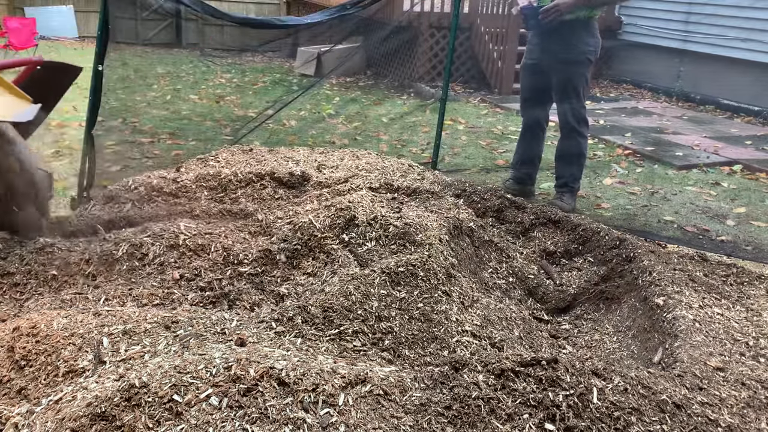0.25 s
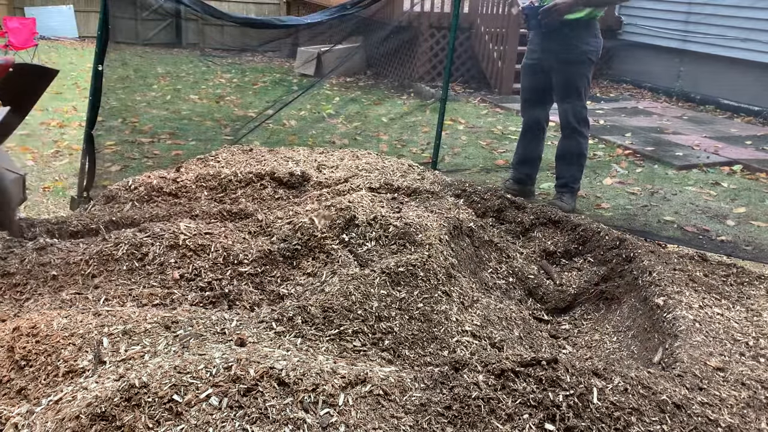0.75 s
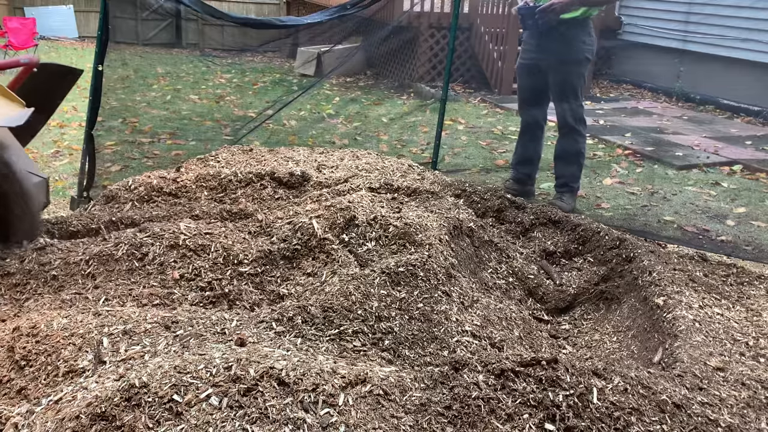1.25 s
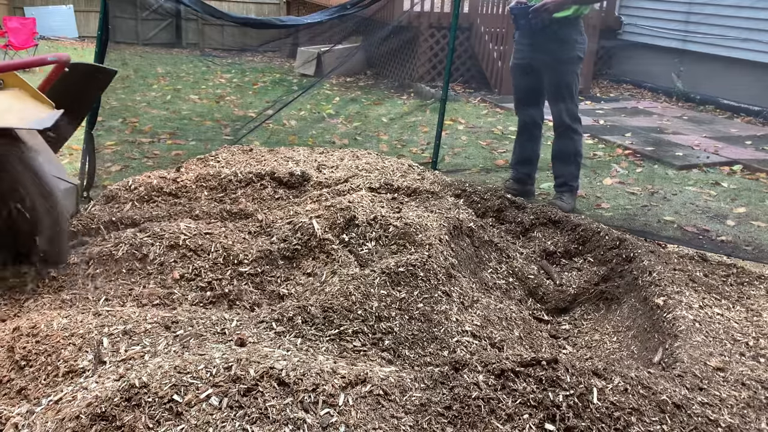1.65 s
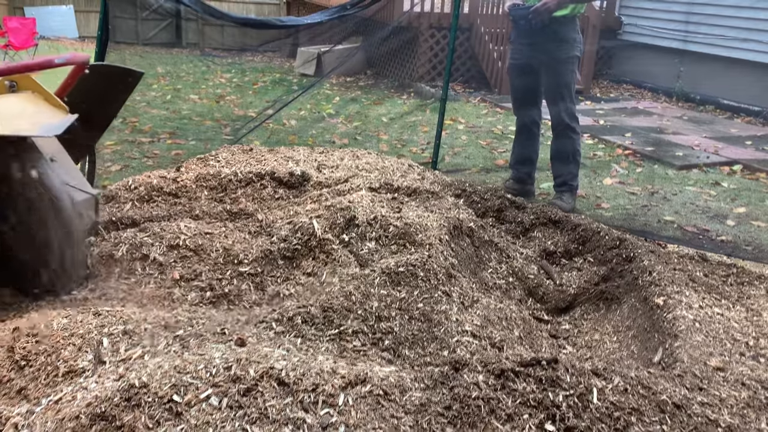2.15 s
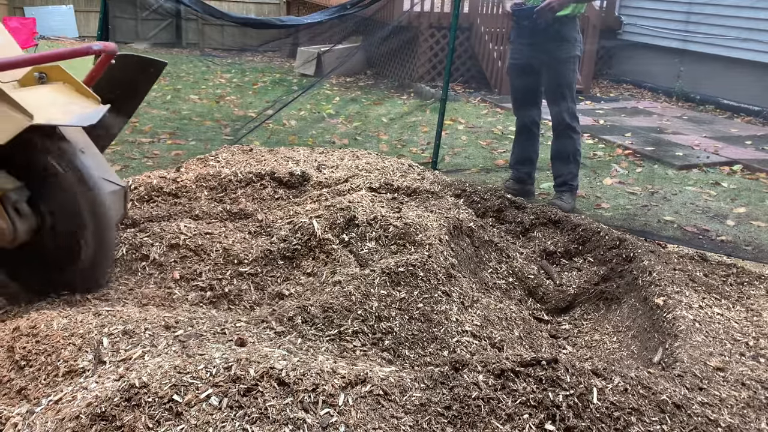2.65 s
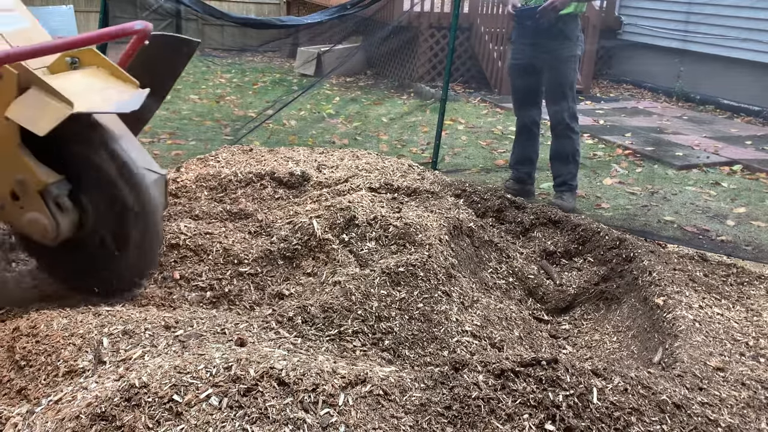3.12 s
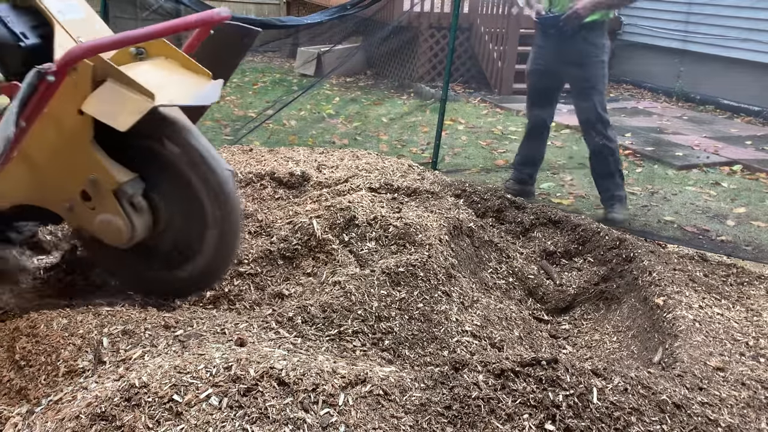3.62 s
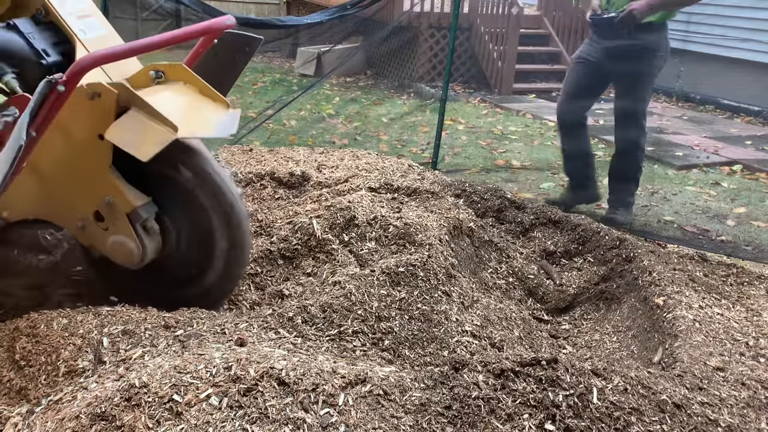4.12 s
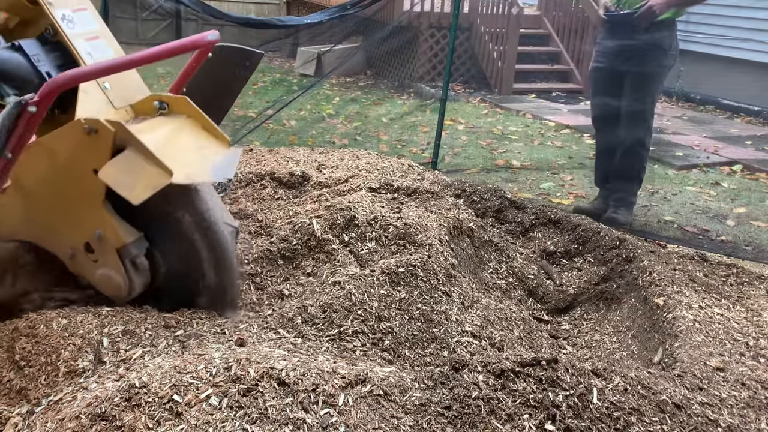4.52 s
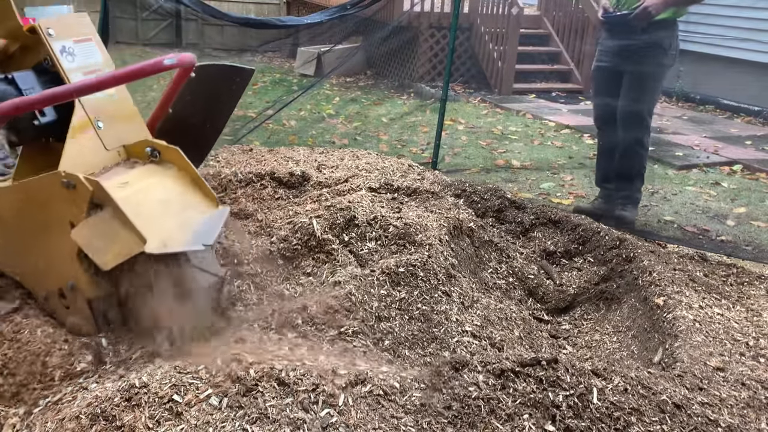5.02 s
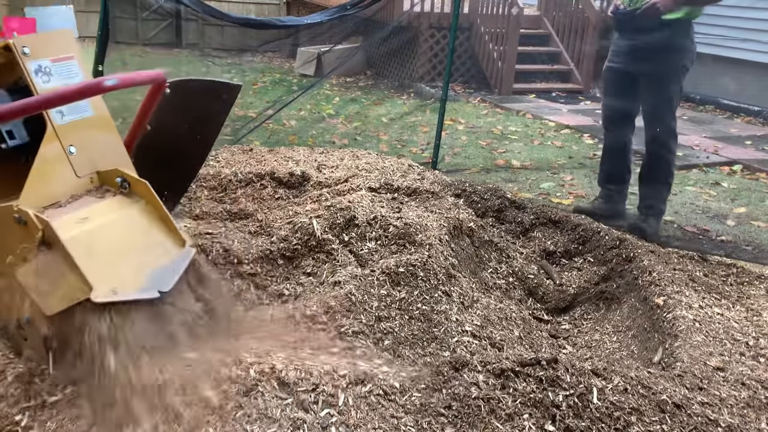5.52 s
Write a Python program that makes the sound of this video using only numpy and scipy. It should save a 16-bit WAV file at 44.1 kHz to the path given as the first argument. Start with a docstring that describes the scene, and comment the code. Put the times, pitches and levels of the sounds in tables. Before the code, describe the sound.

Outdoors in a yard, a petrol stump grinder runs without pause, a low engine drone near 107 hertz under a hydraulic whine. Wheel roar and metal rattle swell as it creeps closer. Scattered bright chips tick on the steel guard, then near five seconds chips hit densely, teeth thud in wood and lumps clank. Close stereo microphones.

```python
"""Stump grinder creeping closer

A petrol stump grinder comes closer from the left across wood chips in a yard, heard by a microphone pair.
Sines locked to the crank make the two-cylinder engine's drone and the whine of hydraulic pump and gears.
Shaped noise makes rumble, wheel roar, casing rattle and the hiss of chips and dust; jolts ring the panels.
Short bursts and struck modes place the chips on the guard, the lumps on steel and the teeth in the wood."""
import sys
import numpy as np
from scipy import signal
from scipy.fft import rfft, irfft, next_fast_len
from scipy.io import wavfile
from scipy.ndimage import uniform_filter1d

SR = 44100
rng = np.random.default_rng(int(sys.argv[2]) if len(sys.argv) > 2 else 0)


def store_wav(level_fs):
    """Save 16-bit WAV to argv[1]."""
    pcm = np.round(np.clip(np.atleast_2d(level_fs), -1, 1) * 32767)
    wavfile.write(sys.argv[1], SR, pcm.T.astype(np.int16))


N = 254456


def gain_of(db):
    """Decibels to gain."""
    return 10 ** (np.asarray(db) / 20)


def evened(x):
    """Scales to rms 1."""
    return x / np.sqrt(np.mean(x ** 2) + 1e-20)


def curves(rows):
    """The columns of a timed table after its first, one value a sample."""
    s, *columns = np.transpose(rows)
    return [np.interp(np.arange(N) / SR, s, column) for column in columns]


def drift(top_hz):
    """Slow random wandering of about rms 1, low-passed at top_hz."""
    steps = rng.standard_normal(N // 64 + 2)  # one step every 64 samples
    smooth = signal.lfilter(*signal.butter(2, top_hz, fs=SR / 64), steps)
    return np.interp(np.arange(N) / 64, np.arange(len(steps)), evened(smooth))


def noise(spectrum, patchy_db, flicker_db, size):
    """Two unrelated noises of one colour that share drifting patches and wide-band flicker."""
    frames = 4 * N // size + 5
    hz = np.fft.rfftfreq(size, 1 / SR)
    a, b, c, d, patches = rng.standard_normal((frames, len(hz), 5)).T
    patches = uniform_filter1d(patches, size=8, axis=0)
    patches = evened(uniform_filter1d(patches, size=8, axis=1))
    table_hz, table_db = np.transpose(spectrum)
    shape_db = np.interp(np.log(hz + 1), np.log(table_hz), table_db, right=-90)[:, None]
    flicker = flicker_db * rng.standard_normal(frames)
    bins = np.array([a + 1j * b, c + 1j * d]) * gain_of(shape_db + patchy_db * patches + flicker)
    return evened(signal.istft(bins, nperseg=size, noverlap=3 * size // 4)[1][:, :N])


def tone(turns, multiple, db, waver_db, wobble, lag=0):
    """A sine locked to the crank, wavering in level and phase; db is rms, wobble and lag in radians."""
    phase = 2 * np.pi * (multiple * turns + rng.random()) + wobble * drift(10.2)
    return np.sqrt(2) * gain_of(db + waver_db * drift(15.4)) * np.sin(phase - lag)


def knocks(rows, decay, rise_s, tick_db, dull, ring):
    """A wide tick together with noise and a sine at a centre pitch for each blow; narrow ones ring longer."""
    out = np.zeros((2, N + 2048))
    t = np.arange(2048) / SR
    hz = np.fft.rfftfreq(2048, 1 / SR) + 1
    draws = rng.standard_normal((len(rows), 2, 2, 2048))
    for (start_s, level_db, centre_hz, octaves), (white, grit) in zip(rows, draws):
        band = 1 / (1 + (2 * np.log2(hz / centre_hz) / octaves) ** 4)
        t60 = decay[0] + decay[1] / octaves  # dull part s, ringing part s octaves
        crunch = evened(irfft(rfft(white) * band * (centre_hz / hz) ** dull))
        struck = crunch + ring * np.sin(2 * np.pi * centre_hz * t)
        burst = struck * (1 - np.exp(-t / rise_s)) * gain_of(-60 * t / t60)
        bright = evened(np.diff(grit, prepend=0))  # differenced noise is bright
        tick = bright * gain_of(tick_db - 60 * t / 0.0095)
        out[:, round(start_s * SR):][:, :2048] += gain_of(level_db) * (burst + tick)
    return out[:, :N]


def nearing(start_db, share):
    """Level of a layer that follows a share of the approach, in dB."""
    # the machine creeps closer: start_s, rise_db (added in full at share 1)
    approach = [(0, 1), (.6, 1.5), (1.05, 3), (1.5, 2), (1.9, 3.5), (2.15, 4), (2.45, 4), (2.7, 5.5),
                (3.3, 7.5), (3.9, 9), (4.4, 9), (4.9, 9.5), (5.2, 12), (5.55, 10.5), (5.77, 12.5)]
    return start_db + share * curves(approach)[0]


def crank_turns():
    """Crank turns so far; the engine sags under load and the governor hunts."""
    # crank speed: start_s, turns_per_s
    crank_speed = [(0, 52.6), (.3, 53.3), (.45, 53.6), (.56, 54.35), (.72, 54.7), (.83, 54.65), (.93, 53.6),
                   (1.11, 54.0), (1.28, 52.65), (1.68, 51.95), (2.0, 53.35), (2.12, 54.15), (2.31, 54.3),
                   (2.45, 54.0), (2.58, 54.1), (2.76, 53.7), (2.87, 53.9), (3.02, 53.55), (3.17, 53.9),
                   (3.32, 53.7), (3.45, 53.95), (3.57, 53.9), (3.7, 54.45), (4.05, 54.2), (4.5, 53.3),
                   (4.72, 52.1), (5.0, 52.08), (5.19, 51.6), (5.48, 51.95), (5.63, 52.4), (5.77, 52.3)]
    return np.cumsum(curves(crank_speed)[0]) / SR


def engine_rumble():
    """Low noise of the engine, swelling as the machine comes closer."""
    # colour of the rumble: pitch_hz, relative_density_db
    rumble_colour = [(16, -62), (30, -62), (44, -46), (57, -1.5), (85, -2.5), (140, 2), (190, 3),
                     (225, -16), (260, -28), (400, -44)]
    level_db = nearing(start_db=-30.5, share=0.27) + 0.41 * drift(3.0)
    return gain_of(level_db) * noise(rumble_colour, patchy_db=0.0, flicker_db=1.0, size=4096)


def spray_and_dust():
    """Chips and dust hiss in gusts, grained by dense random ticks of uneven size."""
    # levels before the gusts and ticks: start_s, chip_spray_db, finest_dust_db
    spraying = [(0, -45.5, -49), (.45, -49.5, -50), (1.0, -44.5, -46), (1.45, -43.5, -48),
                (1.7, -39, -41.5), (2.05, -39.5, -34.5), (2.35, -41.5, -44), (2.6, -41, -39.5),
                (3.15, -40, -42), (3.4, -45.5, -49), (3.7, -46, -47.5), (3.95, -40.5, -42),
                (4.1, -38, -39.5), (4.5, -38, -37.5), (5.0, -36.5, -37.5), (5.3, -33, -40),
                (5.55, -34.5, -39), (5.77, -34, -36)]
    # colour of the chip spray: pitch_hz, relative_density_db
    spray_colour = [(2000, -25), (4000, -8), (5500, -5), (6600, 0), (7600, -3), (8400, -1), (9600, -2),
                    (10800, -5), (12500, -12), (16000, -22)]
    # colour of the finest dust: pitch_hz, relative_density_db
    dust_colour = [(7000, -25), (10500, -7), (12500, -4), (15000, 0), (18000, 0)]
    ticks_per_s, tick_t60_s = 260, 0.0015
    spray_db, dust_db = np.array(curves(spraying)) + 1.8 * drift(11.0)
    sizes = gain_of(1.9 * np.minimum(rng.exponential(1, N), 3.5))
    ticks = sizes * (rng.random(N) < ticks_per_s / SR)
    grain = signal.oaconvolve(ticks, gain_of(-60 * np.arange(1000) / SR / tick_t60_s))[:N]
    chips = gain_of(spray_db) * noise(spray_colour, patchy_db=2.0, flicker_db=1.5, size=256)
    dust = gain_of(dust_db) * noise(dust_colour, patchy_db=1.0, flicker_db=1.2, size=256)
    return (1 + 0.3 * grain) * (chips + dust)


def guard_chips():
    """Chips strike the steel guard: bright, mostly noisy bursts that die in milliseconds."""
    # chips that hit the guard: start_s, level_db (before rise and decay), centre_hz, width_octaves
    chip_hits = [(0.137, -24.5, 8900, 1.3), (0.1961, -19, 7960, 1.3), (0.2005, -27, 6540, 0.36),
                 (0.28, -26, 9000, 1.5), (0.2905, -27.5, 6900, 0.21), (0.294, -25, 3960, 0.73),
                 (0.6928, -22, 6370, 2.5), (0.73, -22.5, 6700, 0.27), (0.8181, -25, 9400, 0.86),
                 (1.0064, -32, 7100, 0.23), (1.4561, -25, 9500, 0.97), (1.4793, -25.5, 6870, 0.19),
                 (1.487, -19, 4400, 1), (1.5144, -21, 7800, 1.2), (1.5255, -23, 6470, 1.3),
                 (1.5332, -23, 9500, 1.2), (1.553, -26, 10000, 1), (1.5728, -14, 9000, 2.3),
                 (1.592, -20, 7345, 1.5), (1.612, -27, 10000, .6), (1.6339, -27, 7200, 0.62),
                 (1.7469, -23, 6410, 1.1), (1.8883, -18.5, 6948, 1.2), (1.9849, -26, 10900, 1),
                 (2.0607, -25, 6750, .6), (2.1617, -20, 8450, 0.87), (2.2378, -25, 8400, 0.7),
                 (2.2679, -17, 8100, 1), (2.5161, -20, 10000, 1.6), (2.543, -26.5, 5600, 0.41),
                 (2.8303, -22, 9160, 1.1), (2.9313, -30, 7600, 1.5), (2.9509, -20, 9800, 0.65),
                 (3.0614, -25, 6280, 1), (3.0809, -11, 9200, 2.3), (3.0885, -17, 10300, 1.3),
                 (3.1373, -23, 10800, 1), (3.174, -22, 10800, .9), (3.269, -21, 9000, 2),
                 (3.3056, -17.5, 8000, 2.2), (3.308, -29, 5670, 0.42), (3.4287, -21, 8800, 1.2),
                 (3.9661, -18, 5770, 1.6), (4.0018, -27, 6700, 0.27), (4.088, -22, 6430, 0.45),
                 (4.1187, -20, 6760, 0.27), (4.4004, -27.5, 5900, 0.22), (4.4707, -20, 7140, 0.96),
                 (4.5171, -21, 10300, 1), (4.6397, -16.5, 7400, 1.2), (4.8949, -16, 10000, 1.3),
                 (4.9714, -7.5, 6170, 1.1), (5.0399, -23, 6630, 0.32), (5.0491, -12, 6900, 2),
                 (5.0838, -8.5, 5086, 2.3), (5.1254, -17, 5070, 1.7), (5.1404, -9.5, 5900, 2),
                 (5.1853, -9, 7700, 1), (5.1933, -17, 5570, 1.7), (5.2332, -17.5, 6860, 0.35),
                 (5.2491, -8.5, 5330, 2.4), (5.3138, -32, 5600, .4), (5.3546, -27, 6600, 0.29),
                 (5.3679, -12, 5200, 0.71), (5.3735, -19, 5000, 0.77), (5.3784, -13.5, 6400, 0.3),
                 (5.385, -19, 5000, 0.52), (5.4241, -21, 9640, 1), (5.475, -34, 6010, .5),
                 (5.562, -15, 8860, 1.2), (5.683, -19, 6040, 1.3), (5.6983, -11, 8800, 1.7),
                 (5.7209, -20, 6940, 0.43), (5.761, -23, 6800, 0.35)]
    return knocks(chip_hits, (0.0045, 0.0088), rise_s=0.0013, tick_db=-7.5, dull=.3, ring=.2)


def steel_lumps():
    """Lumps knock the steel, which rings strongly at each centre pitch; spread about straight ahead."""
    # lumps: start_s, level_db (before rise, decay and the port mix), centre_hz, width_octaves
    lump_hits = [(4.972, -22, 3300, .7), (5.368, -21.5, 3380, 0.22), (5.368, -17, 1017, 0.16),
                 (5.378, -35, 3440, 0.23), (5.388, -21, 1030, 0.13), (5.412, -21, 2750, 0.33),
                 (5.63, -27, 2300, 0.26)]
    middle, side = knocks(lump_hits, (0.013, 0.034), rise_s=0.00069, tick_db=-32, dull=0.45, ring=1.0)
    return 0.45 * middle + 0.34 * side * np.array([[1], [-1]])


def tooth_bites():
    """Each tooth pushes the stump for a moment and its dull modes thud; short contact is brighter."""
    # teeth biting solid wood: start_s, peak_db (mean of the ports), contact_ms, right_over_left_db
    bites = [(4.789, -10, 0.79, 5), (5.0845, -12.5, 0.2, 9), (5.1193, -15, .9, -5), (5.1266, -7, 0.59, 1),
             (5.1301, -9, .9, 0.3), (5.2212, -12, 0.73, 0), (5.2256, -18, .7, 1.5), (5.2499, -6, 0.37, 3.5),
             (5.2526, -7, 0.34, -2), (5.2565, -12, 0.28, 3.5), (5.621, -12, 0.54, 1.5)]
    # modes of the stump: pitch_hz (before 2 % spread), level_db (before spread and push), t60_s
    stump_modes = [(200, -2, 0.034), (403, -1, 0.027), (730, 4, 0.014), (1000, -1.5, 0.03), (1390, -3, .02),
                   (1910, -1, 0.011), (2400, -19, .009)]
    out = np.zeros((2, N + 2048))
    t = np.arange(2048) / SR
    hz, mode_db, t60 = np.transpose(stump_modes)[:, :, None]
    signs = (-1) ** np.arange(len(stump_modes))[:, None]
    spreads = rng.standard_normal((len(bites), 2, len(stump_modes), 1))  # own draw at each port
    for (start_s, peak_db, contact_ms, right_db), spread in zip(bites, spreads):
        fading = gain_of(mode_db + 1.1 * spread - 60 * t / t60)
        rings = fading * np.sin(2 * np.pi * hz * (1 + .02 * spread) * t) * signs
        push = np.sin(np.pi * np.minimum(1000 * t[:128] / contact_ms, 1))  # half a sine, then none
        thud = signal.lfilter(push, 1, rings.sum(1))
        port_db = peak_db + right_db * np.array([[-.5], [.5]])
        out[:, round(start_s * SR):][:, :2048] += gain_of(port_db) * thud / abs(thud).max()
    return out[:, :N]


def steel_panels():
    """Uneven jolts set the steel panels fluttering, each at its own pitch."""
    # panel modes: pitch_hz, rms_db (before the approach), t60_s
    panel_modes = [(354.2, -39, .09), (667, -37.5, 0.091), (1537, -46, 0.055), (1760, -54, .045),
                   (1984, -50, 0.05), (2153, -50.5, 0.048), (2293, -48, 0.051), (2560, -51.5, 0.039),
                   (2781, -49.5, 0.043), (3150, -55.5, 0.038)]
    jolts_per_s, jolt_spread_db, rise_s = 140, 3, 0.0044
    t = np.arange(4096) / SR
    out = np.zeros((2, N))
    for hz, rms_db, t60 in panel_modes:
        strengths = gain_of(jolt_spread_db * np.minimum(rng.exponential(1, (2, N)), 4))
        jolts = strengths * (rng.random((2, N)) < jolts_per_s / SR)
        ring = np.minimum(t / rise_s, 1) * gain_of(-60 * t / t60) * np.sin(2 * np.pi * hz * t)
        out += gain_of(rms_db) * evened(signal.oaconvolve(jolts, ring[None], axes=1)[:, :N])
    return gain_of(nearing(0, 0.53)) * out


def drive_tones(turns):
    """Cooling fan blades and gear teeth pass at fixed multiples of the crank speed."""
    # the drive's tones come and go: start_s, fan_blade_db (before a 1 dB lift), gear_mesh_db
    drive = [(0.0, -43, -45), (.5, -49, -37), (0.9, -40, -43), (1.2, -37, -50), (1.7, -43, -57),
             (1.9, -38, -29.5), (2.2, -35, -33), (2.5, -48, -30), (3.9, -54, -31.5), (4.35, -41, -31.5),
             (4.55, -38, -39), (4.7, -30.5, -36), (5.15, -31, -39), (5.5, -31.5, -50), (5.77, -31.5, -42)]
    blades, mesh = 11, 14.125  # per crank turn
    fan_db, gear_db = curves(drive)
    gears = tone(turns, mesh, gear_db, 1.2, .25)
    gears += gain_of(-12) * tone(turns, 2 * mesh, gear_db, 2.0, .9)
    return gears + tone(turns, blades, fan_db + 1, .8, .12)


def hydraulic_pump(turns):
    """Nine pistons whine on harmonics of their rate; a reflection shifts the 3rd between the ports."""
    # low harmonics: start_s, first_db (before a 0.7 dB lift), second_db
    low_harmonics = [(0, -40.5, -35), (.36, -34.5, -41), (.6, -39, -33), (.9, -36, -39), (1.1, -35, -33.5),
                     (1.5, -38.5, -39), (1.9, -34, -33), (2.2, -31, -30.5), (2.5, -34, -31),
                     (2.9, -32, -34), (3.2, -30.5, -29.5), (3.8, -29, -30.5), (4.0, -31.5, -31.5),
                     (4.3, -31, -31.5), (4.52, -35, -28.5), (4.7, -28, -31), (4.85, -29.5, -28.5),
                     (5.04, -25, -28), (5.2, -38, -41), (5.4, -27, -26), (5.55, -38, -34),
                     (5.77, -31.5, -32)]
    # 3rd harmonic: start_s, left_db, extra_left_over_right_db, extra_left_lead_radians
    third_harmonic = [(0, -38, -2, 1.4), (.4, -42.5, -3, 0.7), (.47, -46, -2, .2), (.49, -49, 4, .8),
                      (.53, -38, 0, 1.5), (.62, -36.5, 3, 1.7), (.83, -37.5, 1, 1.3), (.9, -40, 5, 0.37),
                      (1.7, -40, -2, 0.34), (1.85, -38.5, 0, 1.07), (2.3, -34.5, 1, 0.34),
                      (2.7, -34.5, 5.5, 0.46), (3.3, -30, 2, 0.073), (4.3, -28.5, -2.5, 0.2),
                      (4.7, -27.5, 8, 0.52), (5.1, -31, 3, 1.04), (5.3, -32, -3, 0.96),
                      (5.45, -29, -1, 0.59), (5.77, -29.5, 2, 0.72)]
    # upper harmonics, before a 2.5 dB cut: start_s, fourth_db, fifth_db, sixth_db, seventh_db
    high_harmonics = [(0, -58, -56, -61, -49), (.36, -45, -48, -55, -46), (.54, -60, -58, -57, -51),
                      (.8, -47, -62, -48, -54), (1.1, -47, -53, -50.5, -62), (1.3, -60, -61, -56, -43),
                      (1.5, -66, -49, -55, -46), (1.7, -62, -63, -52, -50), (2.0, -57, -63, -50, -46),
                      (2.25, -59, -51, -64, -65), (2.45, -55, -51, -45.5, -57), (2.75, -56, -46, -46, -51),
                      (3.06, -48, -57, -42, -45), (3.3, -42, -52, -52, -41), (3.5, -47, -43, -53, -52),
                      (3.62, -38, -43, -48, -45), (3.78, -50, -46, -47, -42), (3.96, -40, -45, -40.5, -48),
                      (4.1, -40, -44, -44, -58), (4.3, -60, -36.5, -47, -40), (4.4, -60, -53, -36, -50),
                      (4.52, -43, -38, -52, -47), (4.68, -57, -48, -63, -54), (4.86, -41, -57, -45, -50),
                      (5.04, -36, -51, -58, -49), (5.22, -45, -40, -68, -40), (5.4, -38, -47, -41, -37),
                      (5.52, -43, -49, -48, -42), (5.62, -52, -35, -54, -45), (5.77, -45, -40, -44, -39)]
    pistons = 9  # per crank turn
    first_db, second_db = curves(low_harmonics)
    third_db, over_db, lead = curves(third_harmonic)
    right = np.array([[0], [1]])
    low = tone(turns, pistons, first_db + .7, .7, .12) + tone(turns, 2 * pistons, second_db, 1.4, .35)
    whine = tone(turns, 3 * pistons, third_db - right * over_db, 1.0, .3, right * lead)
    for harmonic, db in enumerate(curves(high_harmonics), start=4):
        whine = whine + tone(turns, pistons * harmonic, db - 2.5, 2.2, .8)
    return low + whine


def exhaust(turns):
    """The two-cylinder drone: a note at about twice the crank speed, with further crank multiples."""
    # the exhaust note: start_s, rms_db
    exhaust_note = [(0, -27), (.3, -25), (.6, -24.5), (1.05, -25), (1.2, -24), (1.35, -25), (1.8, -24),
                    (1.98, -25), (2.25, -21), (2.55, -22), (2.75, -21.5), (3.4, -22), (3.9, -19),
                    (4.35, -20), (4.5, -22), (5.25, -20), (5.45, -22), (5.77, -21)]
    # further orders: crank_multiple, level_db (relative to the exhaust note)
    exhaust_orders = [(4, -18), (6, -18), (7, -20), (10, -23), (13, -22)]
    note_db = curves(exhaust_note)[0]
    drone = tone(turns, 1.999, note_db, 0.35, 0.019)
    for multiple, db in exhaust_orders:
        drone = drone + tone(turns, multiple, note_db + db, 1.2, 0.2)
    return drone


def wheel_and_casing(turns):
    """The wheel's roar pulses unevenly each turn, the casing rattle throbs with the firing."""
    # colour of the wheel's roar: pitch_hz, relative_density_db
    roar_colour = [(120, -46), (230, -5), (340, -3.5), (420, -3), (500, 0.5), (620, -4), (720, 3),
                   (790, -2.5), (860, -5.5), (990, -3), (1100, -7.5), (1300, -12.5), (2200, -22)]
    # colour of the casing rattle: pitch_hz, relative_density_db
    rattle_colour = [(700, -30), (1200, -0.5), (1700, -2.5), (2100, -8.5), (2290, -4), (2500, -6.5),
                     (2790, -7.5), (3050, -5.5), (4000, -7.5), (5500, -14.5), (8000, -19.5)]
    throb = 1 + 0.033 * np.cos(2 * np.pi * 2 * turns) + 0.027 * np.cos(2 * np.pi * turns)
    chug = 1 + 0.075 * np.cos(2 * np.pi * turns + 2.5 * drift(6.2))
    roar_db = nearing(start_db=-31.5, share=0.93) + .5 * drift(16.0)
    roar = gain_of(roar_db) * noise(roar_colour, patchy_db=1.5, flicker_db=0.65, size=1024)
    rattle_db = nearing(start_db=-39.5, share=0.63) + 0.89 * drift(5.0)
    rattle = gain_of(rattle_db) * noise(rattle_colour, patchy_db=1.5, flicker_db=0.04, size=512)
    shudder = gain_of(0.75 * drift(45.))  # the frame shakes both together
    return shudder * (chug * roar + throb * rattle)


def microphones(tones, noises):
    """The right port hears the left one's sound turned in phase, partly swapped for unrelated sound."""
    # microphone pair: pitch_hz, left_lead_radians, left_over_right_db, likeness (0 to 1, of the noises)
    pair = [(0, 0, 0, .98), (110, .1, .3, .98), (220, .3, .1, .97), (450, 1.0, .3, .95), (700, 1.6, 4, .8),
            (980, 2.2, 5, .75), (1400, 3.1, 1, .7), (2700, 6, .5, .4), (4100, 9.4, 0, .25),
            (5000, 12, -1, .25), (5700, 13.2, -2.5, .4), (6500, 12.2, 1.2, .75), (7400, 10.9, 0, .8),
            (8500, 9.42, 0, .97), (10900, 6.28, 0, .85), (13300, 3.14, 0, .95), (15700, 0, 0, .8)]
    size = next_fast_len(N + 2048)
    pair_hz, *columns = np.transpose(pair)
    hz = np.fft.rfftfreq(size, 1 / SR)
    lead, over_db, like = (np.interp(hz, pair_hz, column) for column in columns)
    left_tones, right_tones = rfft(tones, size)
    common, unrelated = rfft(noises, size)
    right = right_tones + like * common + np.sqrt(1 - like ** 2) * unrelated
    right = right * gain_of(-over_db) * np.exp(-1j * lead)
    return irfft(np.array([left_tones + common, right]), size)[:, :N]


def scene():
    """The machine at the two microphone ports; lumps and bites reach both ports together."""
    turns = crank_turns()
    noises = engine_rumble() + spray_and_dust() + guard_chips() + steel_panels() + wheel_and_casing(turns)
    tones = drive_tones(turns) + hydraulic_pump(turns) + exhaust(turns)
    return microphones(tones, noises) + steel_lumps() + tooth_bites()


def record(dry):
    """The band limit: a steep low-pass."""
    edge_hz = 15760
    low_pass = signal.firwin(1023, edge_hz, window=("kaiser", 9), fs=SR)
    return signal.oaconvolve(dry, low_pass[None], "same")


dry = scene()
out = record(dry)
store_wav(out)
```